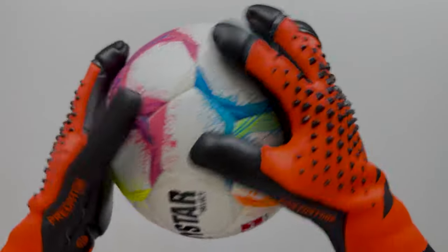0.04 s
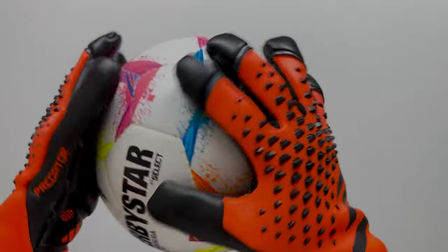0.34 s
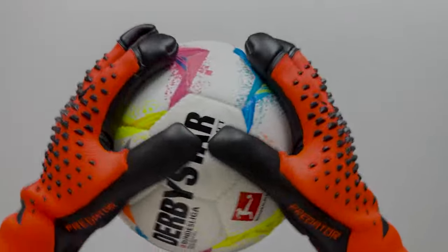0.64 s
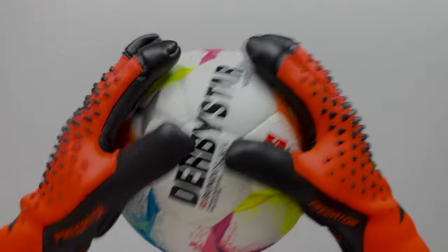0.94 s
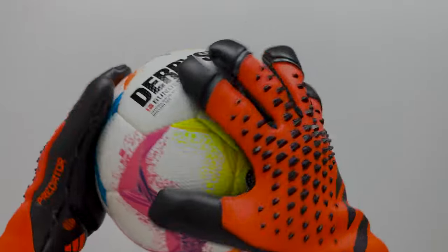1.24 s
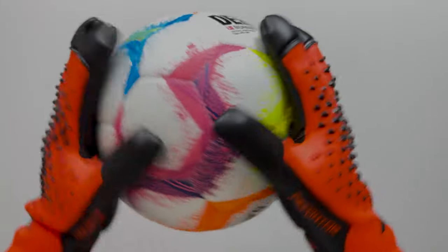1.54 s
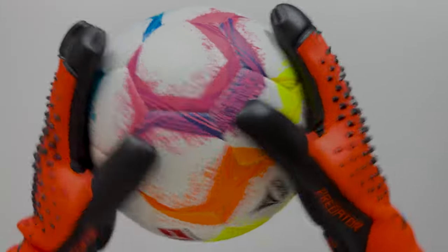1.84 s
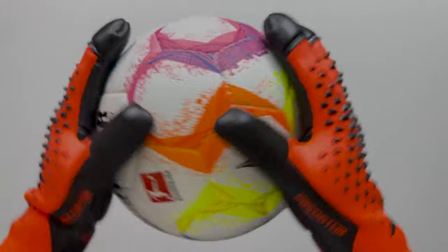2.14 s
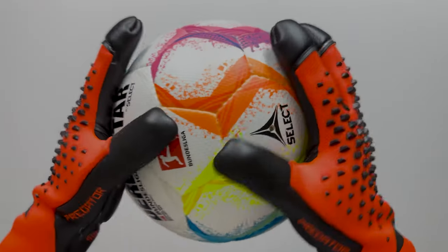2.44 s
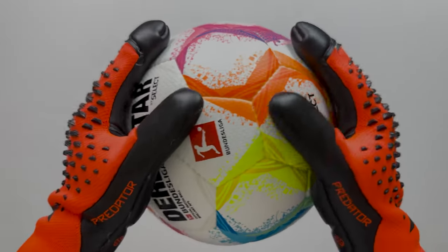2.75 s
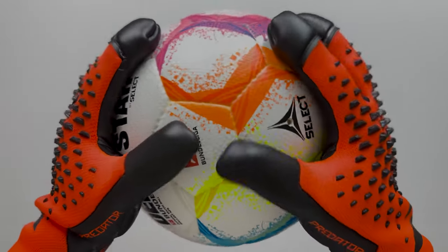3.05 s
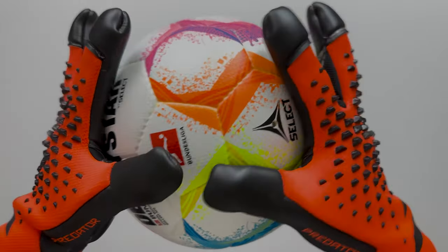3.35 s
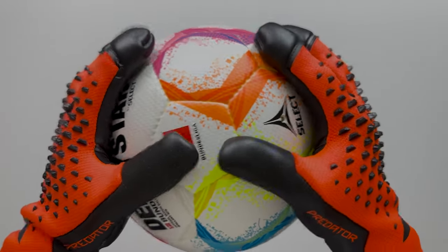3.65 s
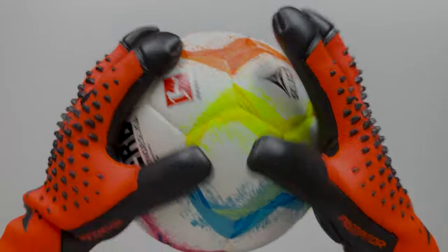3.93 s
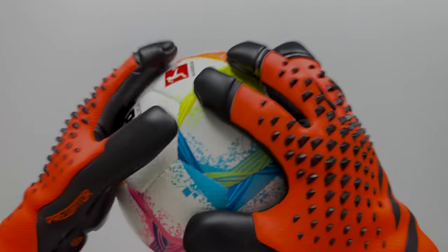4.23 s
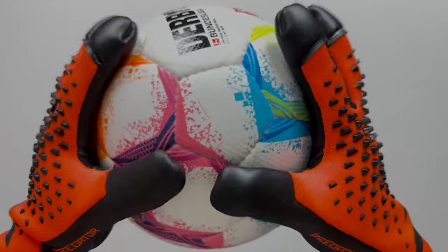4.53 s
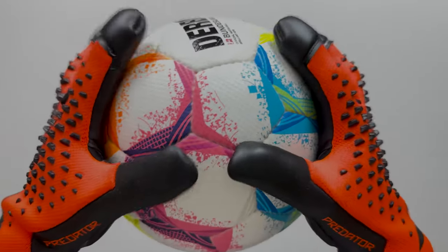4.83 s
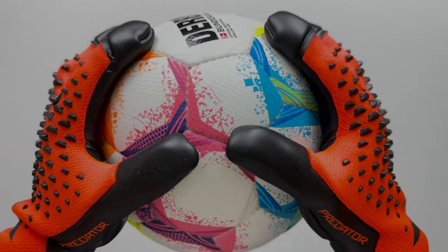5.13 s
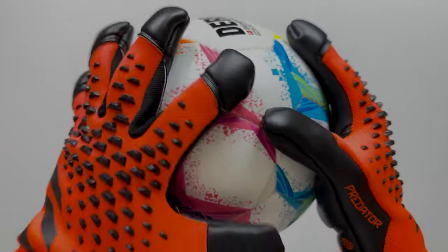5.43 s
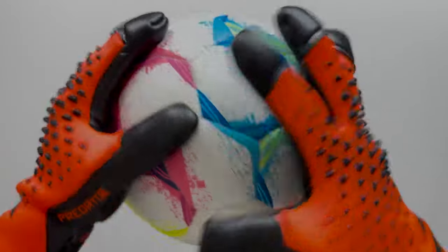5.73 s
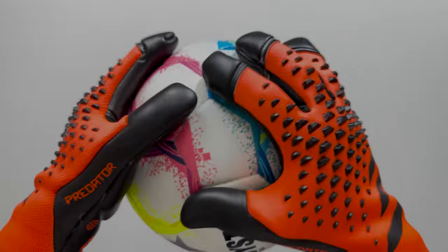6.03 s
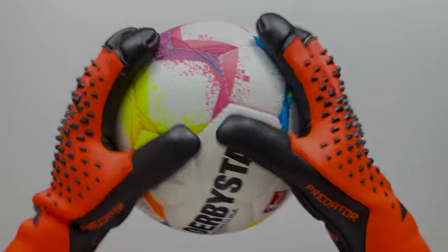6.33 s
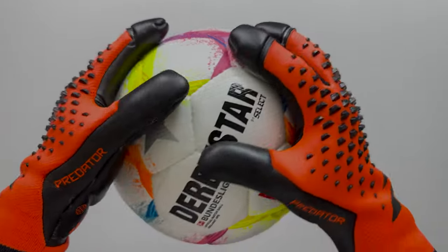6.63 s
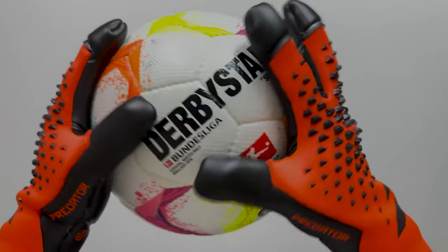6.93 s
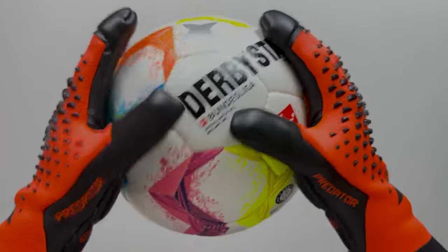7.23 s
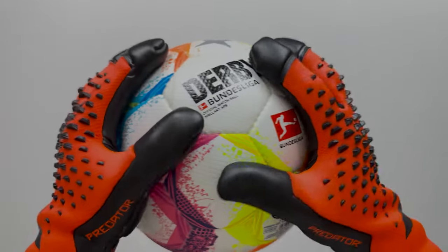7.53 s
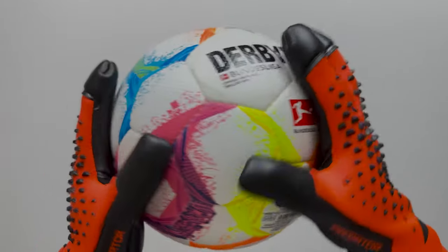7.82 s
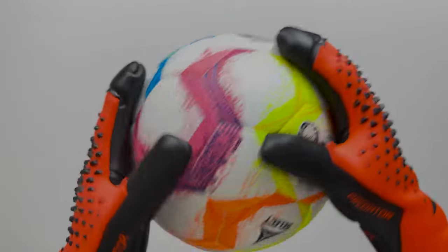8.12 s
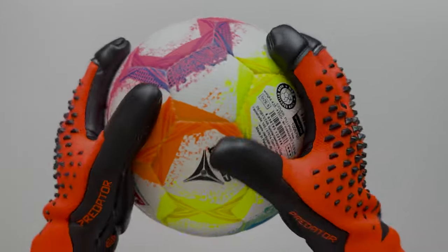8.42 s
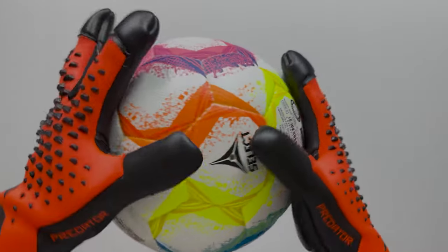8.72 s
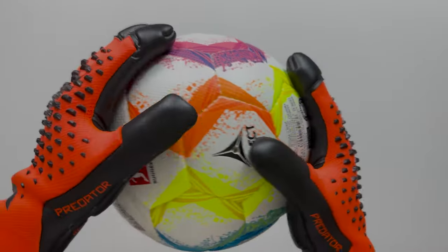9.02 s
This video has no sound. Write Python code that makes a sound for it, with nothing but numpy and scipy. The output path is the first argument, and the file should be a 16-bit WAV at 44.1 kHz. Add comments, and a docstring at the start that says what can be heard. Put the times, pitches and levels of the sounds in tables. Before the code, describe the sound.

Gloved hands rub and squeak over a football in a small room, patting it with hollow thumps and peeling off with sticky snaps.

```python
"""Rubbery squeaks, a grainy hiss and soft thumps: two goalkeeper gloves grip and turn a football.
The latex palms slide with a hiss, squeak as they stick and slip, and peel off with sticky ticks.
Each new grip thumps the ball and rings the air inside; the glove fabric rustles as the fingers flex.
It all happens close to two microphones in a small room."""
import sys
import numpy as np
from scipy import signal
from scipy.fft import rfft, irfft, next_fast_len
from scipy.io import wavfile

SR = 44100
rng = np.random.default_rng(int(sys.argv[2]) if len(sys.argv) > 2 else 0)


def wrap_up_sound(samples):
    """Save the sound to the file named by the first command line argument, as 16-bit audio."""
    columns = np.atleast_2d(samples).T
    # keep every value between -1 and 1, then stretch to whole-number steps
    tamed = np.clip(columns, -1, 1)
    steps = np.round(tamed * 32767).astype(np.int16)
    wavfile.write(sys.argv[1], SR, steps)


N = 408807
TIME = np.arange(N) / SR


# How well the ball's skin gives off a squeak's overtones. Each row: frequency in Hz, relative level in dB.
BALL_SKIN = [(500, 14.5), (1200, 4.5), (2400, -5.5), (3600, -19), (12000, -74.5)]
# The latex catches on the ball. Each row: loudest moment in seconds, length in seconds, pitch in Hz,
# pitch glide in semitones, level in dB, roughness from 0 (pure) to 1 (scratchy).
LATEX_SQUEAKS = [ (0.381, 0.047, 976, -1.5, -31, 0.35), (0.783, 0.041, 1107, -3, -29.5, 0.05),
                 (0.97, 0.033, 1382, -0.5, -23, 0.11), (0.99, 0.026, 1271, 0.5, -12, 0),
                 (1.154, 0.022, 1240, -6.5, -17.5, 0.13), (1.287, 0.065, 1001, -2, -35, 0.26),
                 (1.387, 0.036, 946, -2, -24, 0.35), (1.422, 0.05, 1222, 7, -27, 0.25),
                 (1.589, 0.037, 1235, -2, -20.5, 0.08), (1.618, 0.044, 1185, -1, -19, 0.08),
                 (1.783, 0.027, 1260, 2.5, -26.5, 0), (1.945, 0.063, 1206, -4, -24.5, 0.05),
                 (2.237, 0.051, 1096, -3.5, -21.5, 0.32), (2.371, 0.045, 1504, -5.5, -39, 0.31),
                 (3.737, 0.052, 1214, -1.5, -37, 0.32), (4.309, 0.051, 901, 0, -31.5, 0.48),
                 (4.325, 0.013, 989, 3, -19.5, 0.05), (5.32, 0.016, 974, -1, -24, 0.33),
                 (6.114, 0.054, 956, -0.3, -26, 0.31), (6.715, 0.049, 938, 3.5, -31, 0.14),
                 (7.266, 0.025, 506, 4.5, -26, 0.5), (7.283, 0.045, 1091, -1.5, -15.5, 0.34),
                 (7.699, 0.038, 1054, 3, -32, 0.44), (7.86, 0.016, 1147, 5.5, -26.5, 0.3),
                 (8.15, 0.066, 1228, 3.5, -23, 0.15), (8.621, 0.052, 913, -1.5, -30.5, 0.3),
                 (8.653, 0.058, 548, 2.3, -26.5, 0.47)]

def squeaks(rise_share=.56, jitter=.19, wander=.025, breakup=.26, flutter_db=5, rasp_db=4.5):
    """Latex sticks and slips: scratchy at first, then locked into a pitch, then breaking up again."""
    out, t = np.zeros(N), TIME[:SR // 8]
    for s, length_s, pitch_hz, semitones, level_db, roughness in LATEX_SQUEAKS:
        rise_s = rise_share * length_s
        progress = np.interp(t, [0, rise_s, length_s], [0, 1, 2])   # 0 start, 1 loudest, 2 end
        letting_go = np.maximum(progress - 1, 0)
        rough = np.clip(roughness * 2 ** (1 - progress) + breakup * letting_go ** 2, 0, 1)
        octaves = semitones / 12
        hz = pitch_hz * 2 ** (octaves * np.interp(t, [0, length_s], [-.5, .5]))
        hz *= 1 + wander * np.sqrt(rough) * drift(90, len(t))
        slips_per_s = hz * (1 + jitter * rough * drift(750, len(t)))
        phase = 2 * np.pi * np.cumsum(slips_per_s) / SR
        # rough slips and fast skids have sharper edges, so they sound brighter
        bright_db = rasp_db * rough + .23 * abs(octaves) / length_s
        tone = 0
        for k in range(1, 9):
            overtone_db = at_hz(BALL_SKIN, k * hz) + bright_db * min(k - 1, 2)
            overtone_db += flutter_db * np.sqrt(rough) * drift(220, len(t))
            tone += from_db(overtone_db) * np.sin(k * phase)
        tone /= np.std(tone[progress < 2])
        pulses = rng.standard_normal(len(t)) * (1 + np.cos(phase))   # one rasp per slip
        scrape = from_db(-1) * rms_one(band(pulses, 1100, 2500))
        pressure = np.sin(progress * np.pi / 2).clip(0) ** 1.12
        squeak = np.sqrt(1 - rough ** 2) * tone + rough * scrape
        add(out, s - rise_s, from_db(level_db) * pressure * squeak)
    return out


# The ringing notes of the ball's casing and the air inside.
# Each row: pitch in Hz, relative level in dB, seconds to fade by 60 dB.
BALL_NOTES = [(147, -12.5, 0.052), (317.4, -5.5, 0.035), (487, -1, 0.01), (980, -7.5, 0.045),
              (1260, -2.5, 0.018)]
# A hand lands on the ball. Each row: start in seconds, thump strength in dB, slap strength in dB.
HAND_LANDINGS = [(0.005, -35.5, -44), (1.115, -26, -17), (1.566, -27.5, -39), (3.039, -37, -55),
                 (3.459, -37, -57), (3.862, -44, -79), (4.134, -44.5, -69), (4.474, -15, -10),
                 (5.045, -35.5, -49.5), (5.42, -36.5, -37.5), (6.267, -29, -24.5), (6.526, -43, -49.5),
                 (6.85, -28.5, -19), (7.339, -45, -67), (7.82, -17.5, -20), (8.254, -34.5, -45.5),
                 (9.09, -70.5, -33)]

def grips(bounce_hz=67.3, swell_s=.0082, settle_s=.085, shortest_touch_s=.0036, fingers_s=.012):
    """A slap rings the ball, which swings between the yielding palms and then settles once more."""
    swing, slap, nudge = np.zeros((3, N))
    t = TIME[:SR // 10]
    hardest_db = max(slap_db for _, _, slap_db in HAND_LANDINGS)
    for s, thump_db, slap_db in HAND_LANDINGS:
        hz = bounce_hz * 2 ** (.1 * rng.standard_normal())   # no two grips are equally firm
        swell = t / swell_s * np.exp(1 - t / swell_s)
        bounce = -from_db(thump_db - 3) * swell * np.sin(2 * np.pi * hz * t)
        add(swing, s, bounce)
        add(swing, s + settle_s, from_db(-25) * bounce)
        softer_db = hardest_db - slap_db
        touch_s = shortest_touch_s * np.exp(.052 * softer_db)   # a gentle touch lasts longer
        touch = rng.standard_normal(len(t)) * np.sqrt(t) * np.exp(-t / touch_s)
        touch *= from_db(-3) / np.linalg.norm(touch)
        add(slap, s, from_db(slap_db) * touch)
        late_s = fingers_s * 2 ** rng.uniform(-.26, .36)   # the fingers land just after the palm
        add(slap, s + late_s, from_db(slap_db - 9) * touch)
        # even a gentle touch reaches the ball's low, hollow notes
        add(nudge, s, from_db(hardest_db - .67 * softer_db) * touch)
    ringing = 0
    for k, (hz, db, fade_s) in enumerate(BALL_NOTES):
        push = nudge if hz < 700 else slap
        ringing += (-1) ** k * from_db(db) * ring(push, hz, fade_s)
    pat = from_db(-5) * band(slap, 300, 5000)
    return swing + ringing + pat


# The tone of sliding latex, then of its sticky crackle. Each row: frequency in Hz, relative level in dB.
HISS_TONE = [(250, -20.5), (700, -19.5), (1200, 2.5), (4500, 6.5), (7000, 0), (11000, -4.5), (16000, -21.5)]
CRACKLE_TONE = [(1800, -26), (9000, 4.5), (16000, -4.5)]
# A palm slides over the ball. Each row: middle in seconds, length in seconds, hiss level in dB.
PALM_SLIDES = [ (0.133, 0.12, -40), (0.358, 0.12, -39.5), (0.55, 0.13, -38), (0.779, 0.12, -36.5),
               (0.984, 0.25, -46.5), (1.18, 0.14, -44), (1.29, 0.1, -39), (1.454, 0.13, -40.5),
               (1.643, .114, -34), (1.794, 0.11, -40.5), (1.954, 0.11, -38), (2.1, 0.11, -40),
               (2.25, 0.084, -34.5), (2.362, 0.16, -42.5), (2.855, 0.15, -51), (3.276, 0.048, -38),
               (3.722, 0.064, -40), (3.92, 0.03, -43), (4.001, 0.14, -48), (4.497, 0.084, -56),
               (4.9, 0.059, -45.5), (5.315, 0.037, -46), (5.685, 0.15, -60.5), (5.94, 0.045, -62),
               (6.438, 0.15, -53.5), (7.312, 0.085, -51), (7.688, 0.04, -46.5), (7.875, 0.16, -56),
               (8.103, 0.052, -55), (9.091, 0.084, -61.5)]

def sliding_palms():
    """Latex hisses as it slides, and tiny sticky spots crackle even when the palm is nearly still."""
    sliding = swells(PALM_SLIDES + drags(level_db=-67.5), steepness=2.1)
    hiss = friction(HISS_TONE, grains_per_s=10000, spread_db=.5, flicker_db=1.5)
    peeling = from_db(-20) * sliding + from_db(-85)
    crackle = friction(CRACKLE_TONE, grains_per_s=150, spread_db=3.5, flicker_db=4)
    return sliding * hiss + peeling * crackle


def drags(level_db, length_s=.059):
    """The hand drags on through every squeak: one short movement for each."""
    return [(s, length_s, level_db) for s, *_ in LATEX_SQUEAKS]


# Stuck patches snap free, small spots peel off, and fingertips lift in a run of ticks.
# Each row in all three: start in seconds, peak in dB before gain_db is added.
PATCH_SNAPS = [(1.76, -24.5), (2.849, -18.5), (3.701, -14.5), (3.918, -30), (5.291, -23.5), (7.247, -22),
               (7.692, -21), (8.635, -26), (9.065, -30), (9.093, -19)]
SPOT_TICKS = [(0.4788, -39), (0.8265, -30.5), (0.8594, -26), (1.0818, -30.5), (1.2949, -30), (1.3129, -27),
              (1.358, -32.5), (1.7394, -31), (1.9889, -25.5), (3.257, -40.5), (3.741, -27), (4.0911, -37),
              (6.0625, -41.5), (8.0225, -45), (8.0364, -32), (8.0487, -33), (8.0717, -33)]
FINGER_LIFTS = [(0.875, -30), (1.474, -34), (4.628, -46), (6.786, -40), (7.016, -42), (8.461, -47.5)]

def peeling_latex(tick_gap_s=.032):
    """Sticky latex comes off the ball: patches snap, while smaller spots give higher, shorter ticks."""
    runs = [(s + tick_gap_s * k * (1 + .1 * rng.standard_normal()), db + 2 * rng.standard_normal())
            for s, db in FINGER_LIFTS for k in range(4)]   # four uneven ticks per fingertip
    snaps = cracks(PATCH_SNAPS, low_hz=621, high_hz=2970, decay_s=.0057, gain_db=1.5)
    ticks = cracks(SPOT_TICKS, low_hz=3480, high_hz=10800, decay_s=.00073, gain_db=11)
    lifts = cracks(runs, low_hz=6000, high_hz=16000, decay_s=.0005, gain_db=1)
    return snaps + ticks + lifts


def cracks(events, low_hz, high_hz, decay_s, gain_db):
    """Each time latex lets go, it makes one sharp click and a very short tearing burst."""
    out, t = np.zeros(N), TIME[:SR // 50]
    click = t == 0
    for s, peak_db in events:
        tearing = rng.standard_normal(len(t)) * np.exp(-t / decay_s)
        burst = band(click + tearing / np.linalg.norm(tearing), low_hz, high_hz)
        add(out, s, from_db(peak_db + gain_db) * burst / np.abs(burst).max())
    return out


# The tone of the glove's fabric. Each row: frequency in Hz, relative level in dB.
FABRIC_TONE = [(200, -22), (750, -22.5), (1300, -7.5), (2100, -5.5), (2650, -4), (4600, -7.5), (6200, -22),
               (16000, -52)]

def glove_fabric(brisk_hiss_db=-38.5, brisk_rustle_db=-40.5):
    """The fabric rustles with every stroke, and the rubbing faintly rings the air inside the ball."""
    # the rustle grows more slowly than the hiss, so a harder slide is mostly hiss
    strokes = [(s, length_s, brisk_rustle_db + .57 * (hiss_db - brisk_hiss_db))
               for s, length_s, hiss_db in PALM_SLIDES]
    moving = swells(strokes + drags(level_db=-45.5), steepness=1.41)
    rustle = friction(FABRIC_TONE, grains_per_s=19000, spread_db=2.5, flicker_db=3.5)
    air_ring = from_db(-23) * rms_one(band(rng.standard_normal(N), 320, 375))
    return moving * (rustle + air_ring) + flexing_fingers(rustle)


# The fingers flex. Each row: middle in seconds, relative level in dB, pitch of the hand's hollow in Hz.
FINGER_FLEXES = [(0.108, -42, 1200), (2.473, -50.5, 2720), (2.686, -54, 2800), (2.859, -45.5, 1817),
                 (3.109, -50, 2620), (3.526, -49.5, 2740), (4.02, -43.5, 498), (4.208, -59, 2700),
                 (4.679, -58.5, 2750), (5.117, -55, 2695), (5.682, -63, 1460), (6.39, -57.5, 2410),
                 (6.968, -53, 3010), (7.441, -46, 2900), (7.929, -49.5, 3660), (8.313, -50.5, 3440),
                 (8.654, -52, 1630), (9.092, -52.5, 1100)]

def flexing_fingers(rustle, length_s=.094):
    """Each flex sends the rustle through the hollow under the hand, whose size varies with the grip."""
    out = 0
    for s, db, hz in FINGER_FLEXES:
        hollow = rms_one(band(rustle, hz / 2 ** .4, hz * 2 ** .4))   # 0.4 octaves each way
        out += swells([(s, length_s, db)]) * (from_db(-6) * hollow + from_db(-5) * rustle)
    return out


def rocking_ball(level_db=-69.5, sway_db=6.5, let_go_s=8.7, fade_db_per_s=61):
    """The ball rocks between the hands with a faint rumble until it is let go."""
    fade_db = fade_db_per_s * np.maximum(TIME - let_go_s, 0)
    loudness = from_db(level_db + sway_db * drift(26) - fade_db)
    return loudness * rms_one(band(rng.standard_normal(N), 27, 82))


# How much sound is out of step between the microphones. Each row: frequency in Hz, relative level in dB.
OUT_OF_STEP = [(60, -30), (150, -20), (500, -24.5), (2200, -27), (4000, -37), (8000, -16.5), (14000, -28)]

def microphones(x):
    """Two close microphones hear the ball equally loud, but slightly out of step."""
    size = next_fast_len(N)
    share = from_db(at_hz(OUT_OF_STEP, np.fft.rfftfreq(size, 1 / SR)))
    side = irfft(1j * rfft(x, size) * share, size)[:N]   # 1j shifts each wave by a quarter cycle
    return stereo(x, side)


# How long the room echoes. Each row: frequency in Hz, seconds to fade by 60 dB.
ECHO_FADES = [(100, 0.18), (1200, 0.4), (2200, 0.2), (12000, 0.18)]

def room_echoes(x, level_db=-14, width=.26, first_echo_s=.0036):
    """Dense wall echoes die away octave by octave, nearly alike at the two microphones."""
    t, echoes = TIME[:SR * 2 // 3], 0
    for low_hz in 60 * 2. ** np.arange(9):
        fade_s = at_hz(ECHO_FADES, low_hz * np.sqrt(2))
        noise = band(rng.standard_normal((2, len(t))), low_hz, 2 * low_hz)
        echoes += noise * from_db(-60 * t / fade_s)
    echoes *= np.clip(t / first_echo_s - 1, 0, 1)
    echoes /= np.linalg.norm(echoes[0])
    mid, side = signal.fftconvolve(x[None], echoes, axes=1)[:, :N]
    return from_db(level_db) * stereo(mid, width * side)


# The tone of the quiet room. Each row: frequency in Hz, relative level in dB.
ROOM_TONE = [(50, -16.5), (200, -3), (16000, -28)]

def room_noise(level_db=-71.5, width=.35):
    """A faint, steady hush lies behind everything."""
    mid, side = [colour(rng.standard_normal(N), ROOM_TONE) for _ in range(2)]
    return from_db(level_db) * stereo(mid, width * side)


def friction(tone, grains_per_s, spread_db, flicker_db):
    """Rubbing is countless tiny slips of uneven size, coming in clumps."""
    sizes = from_db(spread_db * np.minimum(rng.exponential(1, N), 5)) * rng.standard_normal(N)
    slips = sizes * (rng.random(N) < grains_per_s / SR)
    return colour(slips * from_db(flicker_db * drift(140)), tone)


def swells(movements, steepness=2):
    """Each hand movement swells and fades like a hill; a steeper one starts and stops more suddenly."""
    power = np.zeros(N)
    for s, length_s, db in movements:
        near = np.abs(TIME - s) < 2 * length_s
        hill = np.exp(-np.abs(2 * (TIME[near] - s) / length_s) ** steepness)
        power[near] += (from_db(db) * hill) ** 2
    return np.sqrt(power)


def from_db(db):
    """Turn decibels into a number to multiply by."""
    return 10 ** (np.asarray(db) / 20)


def rms_one(x):
    """Scale a signal so that its average (rms) level is 1."""
    return x / np.sqrt(np.mean(x ** 2) + 1e-20)


def at_hz(table, hz):
    """Read between a table's rows, giving every octave the same width."""
    known_hz, values = np.transpose(table)
    return np.interp(np.log(np.maximum(hz, 1)), np.log(known_hz), values)


def colour(x, tone):
    """Shape a signal's lows and highs with a tone table, then set its average level to 1."""
    size = next_fast_len(N)
    gains = from_db(at_hz(tone, np.fft.rfftfreq(size, 1 / SR)))
    return rms_one(irfft(rfft(x, size) * gains, size)[:N])


def band(x, low_hz, high_hz):
    """Keep the sound between two frequencies."""
    bandpass = signal.butter(2, [low_hz, min(high_hz, .45 * SR)], "band", fs=SR, output="sos")
    return signal.sosfilt(bandpass, x + 1e-18)


def drift(rate, size=N):
    """A random wobble of about size 1 that glides to a new value `rate` times a second."""
    knots = rng.standard_normal(size // 4)
    return rms_one(np.interp(np.arange(size) * rate / SR, np.arange(len(knots)), knots))


def ring(x, hz, fade_s):
    """Every click in x starts a pure note that fades by 60 dB in fade_s."""
    decay, turn = from_db(-60 / (fade_s * SR)), 2 * np.pi * hz / SR
    return signal.lfilter([0, np.sin(turn)], [1, -2 * decay * np.cos(turn), decay ** 2], x + 1e-18)


def add(out, s, sound):
    """Mix a sound in, starting at s seconds."""
    start = max(round(s * SR), 0)
    out[start:start + len(sound)] += sound[:N - start]


def stereo(mid, side):
    """Left and right share mid; side is what sets them apart."""
    return np.array([mid + side, mid - side])


def scene():
    """The hands work straight in front of the microphones, over a faint room noise."""
    handling = peeling_latex() + squeaks() + glove_fabric() + sliding_palms() + rocking_ball() + grips()
    return microphones(handling) + room_echoes(handling) + room_noise()


def record(dry):
    """The highest treble, above 16200 Hz, is cut steeply."""
    return signal.sosfilt(signal.ellip(10, .1, 80, 16200, fs=SR, output="sos"), dry)


dry = scene()
out = record(dry)
wrap_up_sound(out)
```